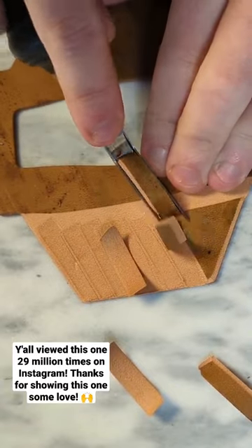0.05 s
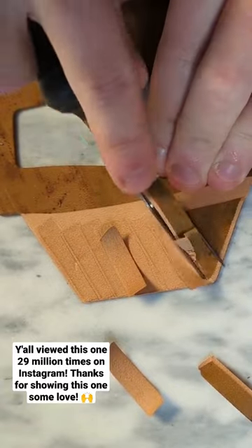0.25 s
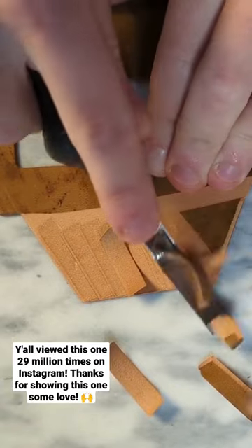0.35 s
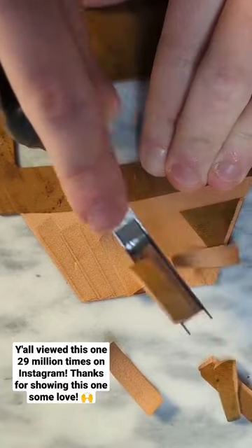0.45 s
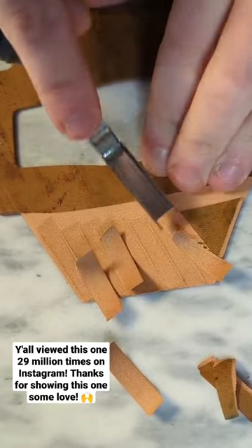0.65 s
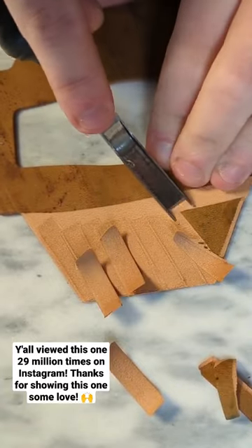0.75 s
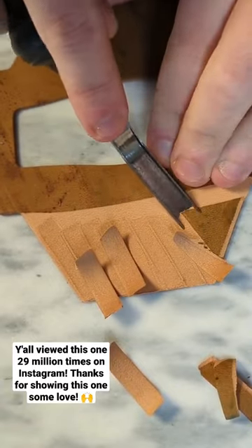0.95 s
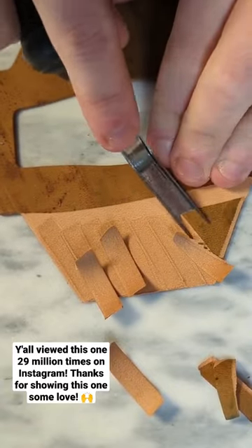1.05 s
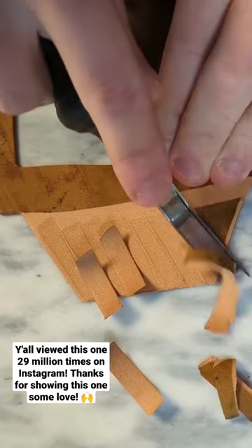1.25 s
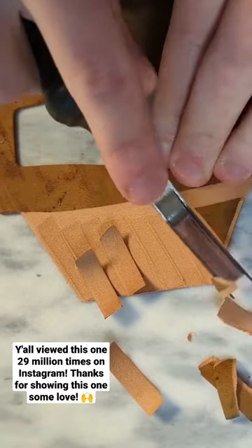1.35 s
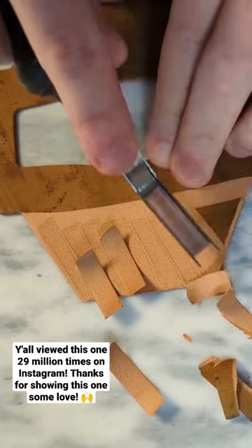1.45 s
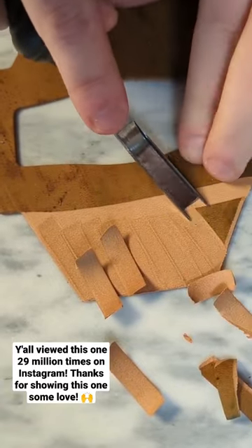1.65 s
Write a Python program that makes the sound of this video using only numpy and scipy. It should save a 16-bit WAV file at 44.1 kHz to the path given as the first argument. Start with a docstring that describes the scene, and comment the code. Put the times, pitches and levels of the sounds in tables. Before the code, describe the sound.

A small steel blade scrapes twice through leather on stone, crackling, hissing and ringing, with light taps.

```python
"""A small steel skiving blade is pushed twice through leather lying on a stone slab, close by in a quiet room.
Parting fibres make a dense, fine crackle that hisses and rubs the modes of blade and slab into ringing.
Two blade modes also sing as wavering sines and ring on when freed; the edge squeaks thinly late in each cut.
Light taps (noise ticks, dull knocks, struck modes), finger thumps and leather rustle accompany the work.
A low room rumble lies beneath, of coloured noise with a few droning resonances."""
import sys
import numpy as np
from scipy import signal
from scipy.fft import rfft, irfft
from scipy.io import wavfile

SR = 44100
rng = np.random.default_rng(int(sys.argv[2]) if len(sys.argv) > 2 else 0)


def store_pcm(level_fs):
    """Save levels as 16-bit WAV."""
    pcm = np.round(np.clip(level_fs, -1, 1) * 32767).astype(np.int16)
    wavfile.write(sys.argv[1], SR, np.atleast_2d(pcm).T)


N = 74970
TIME = np.arange(N) / SR

# colour of the fibre hiss: [f/Hz, relative level/dB]
HISS_COLOUR = [(400, 9), (800, 5.5), (2000, 10), (3300, 10), (3900, 4.5), (4600, 8), (6000, 6.5), (8400, 5),
               (9400, 7), (10000, -5.5), (10800, 4), (12700, 3), (14000, 0), (14500, -33)]
# modes of the steel blade and its handle, undamped: [f/Hz, relative level/dB, t60/s]
BLADE_MODES = [(960, -11.5, 0.24), (978.3, -10.5, 0.22), (1320.8, -2, 0.39), (1558, -1, 0.15),
               (1574.7, -1, 0.076), (1848, -5.5, 0.12), (1951.6, -5, 0.22), (2124, -19, 0.14),
               (2877, -16, 0.18), (3034, -6.5, 0.23), (3059, -10.5, 0.25), (3289, -13, 0.055),
               (8780, -24, 0.16), (9430, -28.5, 0.11), (9110, -23, 0.087)]
# modes of the slab and bench, undamped: [f/Hz, relative level/dB, t60/s]
SLAB_MODES = [(578.4, -0.5, 0.18), (619, -0.5, 0.22), (632.6, 4, 0.067), (681.5, 0, 0.09),
              (736, -10.5, 0.094), (917, -12.5, 0.097)]


def from_db(db):
    """Decibels to gain."""
    return 10 ** (np.asarray(db) / 20)


def rms_one(x):
    """Scale to unit rms."""
    return x / np.sqrt(np.mean(x ** 2) + 1e-20)


def decay(age, t60):
    """Exponential decay, 60 dB down after t60 seconds."""
    return np.exp(-np.log(1000) * age / t60)


def gate(start, end):
    """Fully open between two times, with soft edges outside them."""
    edge_s = 0.013
    return np.clip(np.minimum(TIME - start, end - TIME) / edge_s + 1, 0, 1)


def gains(rows):
    """Level columns of a curve as gains over time, faded out beyond its ends."""
    s, *columns = np.transpose(rows)
    return [from_db(np.interp(TIME, s, db)) * gate(s[0], s[-1]) for db in columns]


def burst(start, t60):
    """Quick rise and exponential decay."""
    attack_s = 0.0022
    age = np.maximum(TIME - start, 0)
    return np.minimum(age / attack_s, 1) * decay(age, t60)


def colour(x, points):
    """Give a steady noise a spectrum, drawn over log frequency; rms 1."""
    hz, db = np.transpose(points)
    bins = np.maximum(np.fft.rfftfreq(N, 1 / SR), 1)
    spectrum_db = np.interp(np.log(bins), np.log(hz), db)
    return rms_one(irfft(rfft(x) * from_db(spectrum_db), N))


def wander(cutoff_hz):
    """Slow random motion, noise low-passed at the cutoff; rms 1."""
    lowpass = signal.butter(2, cutoff_hz, fs=SR, output="sos")
    return rms_one(signal.sosfilt(lowpass, rng.standard_normal(N)))


def ring(x, hz, t60):
    """A two-pole resonator: a unit click sets a sine of about height 1 ringing."""
    radius = decay(1 / SR, t60)
    angle = 2 * np.pi * hz / SR
    feedback = [1, -2 * radius * np.cos(angle), radius * radius]
    return signal.lfilter([0, np.sin(angle)], feedback, x + 1e-18)


def room_tone():
    """Low rumble of coloured noise with a few narrow, noise-driven drones."""
    # colour of the room: [f/Hz, relative level/dB]
    tone_colour = [(25, -42), (48, -13.5), (72, 0), (100, -1), (135, -0.5), (240, -6), (340, -7),
                   (460, -19.5), (620, -13.5), (1000, -27), (2800, -30), (4500, -37), (9500, -47),
                   (12500, -48.5), (15500, -60)]
    # low resonances: [f/Hz, level/dB, t60/s]
    drone_modes = [(69.8, -69, 0.28), (194.7, -74.5, 0.78), (232.6, -70, .4)]
    level_db = -61
    out = from_db(level_db) * colour(rng.standard_normal(N), tone_colour)
    for hz, db, t60 in drone_modes:
        drone = ring(rng.standard_normal(N), hz, t60)
        out += from_db(db) * colour(drone, tone_colour)
    return out


def fibres():
    """Dense tiny snaps of uneven size, bunched by the judder of the edge; rms 1."""
    snaps_per_s, spread_db = 14000, 3
    judder_db, judder_hz = 0.5, 46
    snaps = (rng.random(N) < snaps_per_s / SR) * rng.choice([-1, 1], N)
    # many small snaps, few big ones
    sizes = from_db(spread_db * np.minimum(rng.exponential(1, N), 5))
    return rms_one(snaps * sizes * from_db(judder_db * wander(judder_hz)))


def rubbed(force, modes):
    """A body's modes under friction, steep-sided, sharing the power of the force by their levels."""
    grip_damping = 0.87   # share of the ring time left while cutting
    skirt_t60_s = 0.018   # a second, duller resonator steepens the sides
    out = 0
    for hz, db, t60 in modes:
        mode = ring(ring(force, hz, t60 * grip_damping), hz, skirt_t60_s)
        out += from_db(db) * rms_one(mode)
    return rms_one(out) * np.std(force)


def cutting():
    """Parting fibres hiss and drive slab and blade; after the first cut the blade slides on lightly."""
    # one curve for each cut, before the trims: [t/s, fibre hiss/dB, slab drive/dB, blade drive/dB]
    cuts = [
        [(0.13, -99, -72, -100), (0.168, -79.5, -63.5, -69.5), (0.21, -70.5, -60, -55),
         (0.232, -65.5, -51, -54), (0.272, -62, -55, -48.5), (0.334, -58, -50, -52.5), (0.348, -59, -58, -43.5),
         (0.378, -57, -48.5, -47.5), (0.406, -55, -55.5, -52), (0.416, -56, -42.5, -52),
         (0.46, -56.5, -58, -47.5), (0.48, -58, -61, -61)],
        [(1.08, -87, -96, -94), (1.098, -91, -61, -73.5), (1.158, -71.5, -50, -55.5), (1.178, -72, -58, -59),
         (1.226, -62, -48.5, -48.5), (1.254, -58.5, -45, -46), (1.314, -56, -51.5, -48.5),
         (1.35, -57, -51.5, -43), (1.374, -58.5, -59.5, -46), (1.39, -57, -55, -60.5), (1.422, -76, -73, -56.5),
         (1.46, -72, -77, -110)],
    ]
    # the slide, before its trim: [t/s, hiss/dB]
    slide = [(0.493, -45), (0.495, -52.5), (0.593, -76.5), (0.66, -108)]
    hiss_trim_db, slab_trim_db, blade_trim_db, slide_trim_db = -0.5, -2, 1, -5
    ring_low_hz = 567
    hiss = colour(fibres(), HISS_COLOUR)
    out = from_db(slide_trim_db) * gains(slide)[0] * hiss
    rings = 0
    for cut in cuts:
        hiss_gain, slab_gain, blade_gain = gains(cut)
        out += from_db(hiss_trim_db) * hiss_gain * hiss
        rings += from_db(slab_trim_db) * rubbed(fibres() * slab_gain, SLAB_MODES)
        rings += from_db(blade_trim_db) * rubbed(fibres() * blade_gain, BLADE_MODES)
    # the ringing of both bodies has a steep lower edge
    low_edge = signal.cheby1(8, 1, ring_low_hz, "high", fs=SR, output="sos")
    return out + signal.sosfilt(low_edge, rings)


def singing_mode(curves, hz, trim_db, ring_out):
    """A mode of the blade wavers while the leather drags on it and dies away pure once freed."""
    wander_hz, wander_rad, flutter_db = 34, 0.33, 0.9
    out = 0
    for curve, t60 in zip(curves, ring_out):
        s, db = np.transpose(curve)
        held = np.minimum(TIME, s[-1])   # stops at the release, which freezes the wavering
        phase = np.interp(held, TIME, wander(wander_hz))
        flutter = np.interp(held, TIME, wander(wander_hz)) * gate(s[0], s[-1])
        level = from_db(trim_db + np.interp(TIME, s, db) + flutter_db * flutter)
        fade = gate(s[0], TIME[-1]) * decay(TIME - held, t60)
        sine = np.sqrt(2) * np.sin(2 * np.pi * hz * TIME + wander_rad * phase)   # rms 1
        out += level * fade * sine
    return out


def blade_singing():
    """Drag keeps two modes of the blade singing until each cut frees them to ring out."""
    # one curve for each cut, before the trims: [t/s, level/dB]
    main_curves = [
        [(0.15, -76), (0.202, -58), (0.226, -64), (0.292, -45), (0.348, -51), (0.392, -37.5), (0.436, -46),
         (0.472, -36)],
        [(1.11, -71), (1.136, -60.5), (1.178, -69), (1.244, -47), (1.266, -55), (1.308, -39.5), (1.358, -43.5),
         (1.38, -38)],
    ]
    upper_curves = [
        [(0.175, -89), (0.209, -53.5), (0.259, -49.5), (0.371, -56), (0.421, -43), (0.465, -51)],
        [(1.13, -68), (1.14, -70), (1.218, -65), (1.246, -52), (1.39, -48.5)],
    ]
    # ring_out: t60 in s after the first and the second cut
    main = singing_mode(main_curves, hz=1522, trim_db=1, ring_out=(0.29, 0.13))
    upper = singing_mode(upper_curves, hz=1862.5, trim_db=-3, ring_out=(0.063, 0.14))
    return main + upper


def squeaks():
    """Friction briefly excites a high, damped resonance of the edge."""
    # thin squeaks late in each cut: [t/s, length/s, level/dB]
    squeak_events = [(0.444, 0.018, -53), (1.37, 0.02, -59.5)]
    squeak_hz, squeak_t60_s = 12600, 0.0019
    level = sum(from_db(db) * gate(s, s + length) for s, length, db in squeak_events)
    return level * rms_one(ring(colour(fibres(), HISS_COLOUR), squeak_hz, squeak_t60_s))


def clicks(times, levels_db):
    """One impulse for each blow."""
    out = np.zeros(N)
    index = np.clip((np.asarray(times) * SR).astype(int), 0, N - 1)
    out[index] = from_db(levels_db)
    return out


def struck(blows, modes):
    """A body's modes after blows, damped by the leather, in alternating polarity."""
    tap_damping = 0.76   # share of the ring time left while the tool rests on the leather
    out = 0
    for k, (hz, db, t60) in enumerate(modes):
        out += (-1) ** k * from_db(db) * ring(blows, hz, t60 * tap_damping)
    return out


def taps():
    """Each tap is a gritty tick, a dull knock in the slab and a short ring of slab and blade."""
    # taps of the tool: [t/s, slab blow/dB, blade blow/dB, contact tick/dB, tick t60/s]
    tap_events = [(0.486, -83, -63, -32, .016), (0.815, -57.5, -67, -83, 0.16),
                  (.871, -45.5, -60.5, -58, 0.046), (.935, -63, -66.5, -72.5, 0.042),
                  (1.098, -56, -82, -89, 0.032), (1.468, -55, -83, -71, .09),
                  (1.483, -53.5, -79, -66, 0.033), (1.533, -54, -63.5, -83, 0.074),
                  (1.609, -63, -69.5, -73, 0.063), (1.689, -61, -81, -67, 0.047)]
    # colour of the ticks: [f/Hz, relative level/dB]
    tick_colour = [(500, -9), (2000, -33), (4000, 7), (6000, 11), (9000, 6.5), (10500, 3), (13700, 14),
                   (14600, -8)]
    # colour of the dull part of the knocks: [f/Hz, relative level/dB]
    knock_colour = [(35, -34), (80, 13.5), (300, -8), (700, 0), (1100, -6.5), (1700, 1), (2300, -13),
                    (2900, -5), (4500, -22), (12000, -53)]
    knock_trim_db, knock_t60_s = -3.5, 0.072
    tick_level, knock_level = 0, 0
    for t, slab_db, _, tick_db, tick_t60 in tap_events:
        tick_level += from_db(tick_db) * burst(t, tick_t60)
        knock_level += from_db(slab_db + knock_trim_db) * burst(t, knock_t60_s)
    tick = tick_level * colour(fibres(), tick_colour)
    knock = knock_level * colour(fibres(), knock_colour)
    times, slab_levels, blade_levels, _, _ = np.transpose(tap_events)
    slab_ring = 0.5 * struck(clicks(times, slab_levels), SLAB_MODES)
    blade_ring = struck(clicks(times, blade_levels), BLADE_MODES)
    return tick + knock + slab_ring + blade_ring


def handling():
    """Soft finger thumps of resonant grain noise, and the uneven rustle of leather and shavings."""
    # fingers press and shift on the leather: [t/s, level/dB]
    presses = [(0.569, -56), (0.747, -58), (1.093, -61), (1.483, -54.5), (1.599, -60.5), (1.659, -58.5)]
    # leather and shavings rustle under the hand: [t/s, length/s, level/dB]
    rustles = [(0.497, 0.08, -67), (.59, .075, -71.5), (0.815, 0.167, -76), (1.45, 0.24, -70)]
    # colour of the rustle: [f/Hz, relative level/dB]
    rustle_colour = [(400, 1), (1300, 5), (2800, 2.5), (4500, -8), (9000, -20), (12500, -23), (15000, -44)]
    press_hz, press_width_t60_s, press_t60_s = 356, 0.042, 0.16
    uneven_db, uneven_hz = 2.5, 26
    press_level = sum(from_db(db) * burst(s, press_t60_s) for s, db in presses)
    thumps = press_level * rms_one(ring(fibres(), press_hz, press_width_t60_s))
    rustle_level = sum(from_db(db) * gate(s, s + length) for s, length, db in rustles)
    grains = fibres() * from_db(uneven_db * wander(uneven_hz))
    return thumps + rustle_level * colour(grains, rustle_colour)


def room(x):
    """A short diffuse tail of decaying noise."""
    delay_s, t60_s, level_db = 0.008, 0.22, -11.5
    tail = rng.standard_normal(N) * burst(delay_s, t60_s)
    return from_db(level_db) * signal.fftconvolve(x, tail / np.linalg.norm(tail))[:N]


def scene():
    """The work on the slab, its room and the room tone."""
    work = cutting() + blade_singing() + squeaks() + taps() + handling()
    return (work + room(work) + room_tone())[None]


def record(dry):
    """The top is cut steeply."""
    cutoff_hz = 15700
    lowpass = signal.ellip(10, 0.1, 80, cutoff_hz, fs=SR, output="sos")
    return signal.sosfilt(lowpass, dry)


dry = scene()
out = record(dry)
store_pcm(out)
```